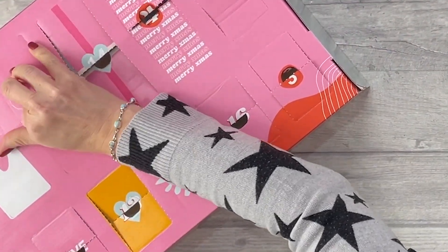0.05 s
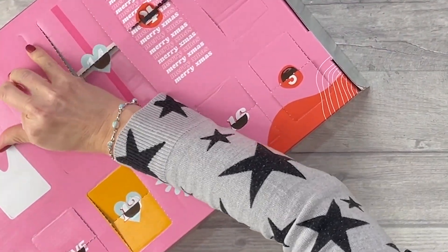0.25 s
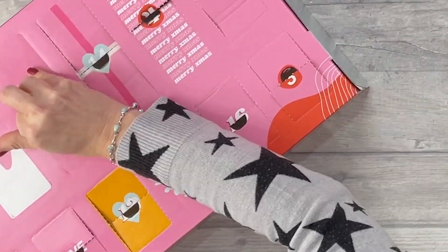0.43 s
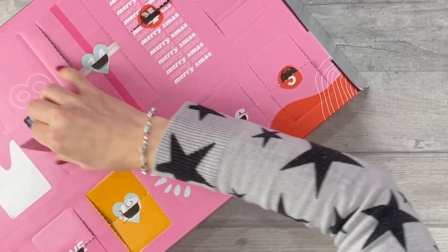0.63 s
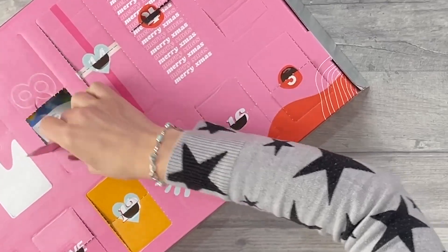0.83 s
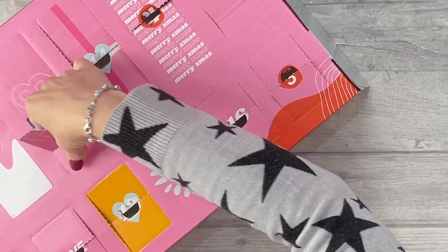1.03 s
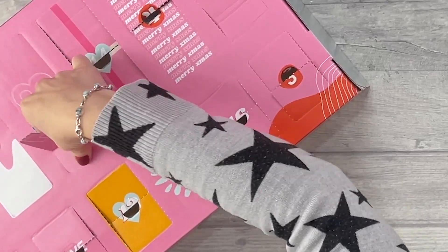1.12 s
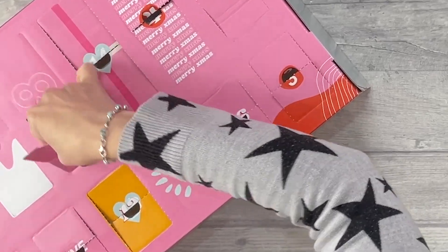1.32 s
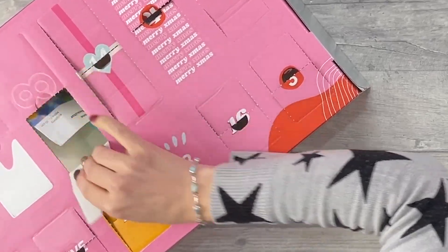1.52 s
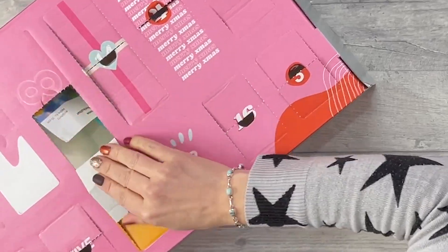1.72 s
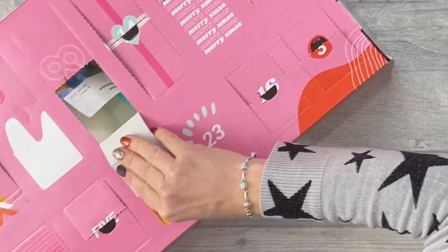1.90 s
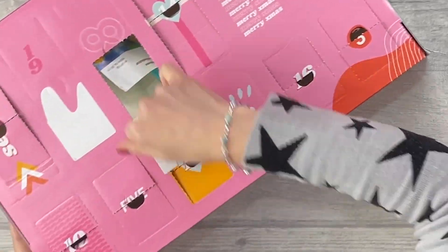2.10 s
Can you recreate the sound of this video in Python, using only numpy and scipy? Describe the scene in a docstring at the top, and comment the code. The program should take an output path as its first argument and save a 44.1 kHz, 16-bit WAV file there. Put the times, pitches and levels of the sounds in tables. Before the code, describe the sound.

Close up in a small quiet room, stiff cardboard cracks open sharply over a hollow box, fingers tap lightly, remaining paper ties tear in a fast run, and a hand knocks and rubs the flap.

```python
"""Bursting a perforated cardboard door

One loud pop with a thump of the lid, then small taps and crackles; a second later paper ties rip in a
quick run, then knocks, clicks and a hand sliding over the flap. Close stereo microphone, small room.
Tears and clicks are dying noise bursts, board and lid are damped modes, rubbing is rough coloured noise.
The microphone rounds off the highest peaks.
"""
import sys
import numpy as np
from scipy import signal
from scipy.fft import rfft, irfft, next_fast_len
from scipy.io import wavfile
from scipy.ndimage import map_coordinates

SR = 44100
rng = np.random.default_rng(int(sys.argv[2]) if len(sys.argv) > 2 else 0)


def pcm_store(signal):
    """Save signal as 16-bit PCM."""
    levels = np.round(np.clip(np.atleast_2d(signal), -1, 1) * 32767)
    wavfile.write(sys.argv[1], SR, levels.astype(np.int16).T)


N = 94815


def amp(db):
    """Decibels to gain."""
    return 10 ** (np.asarray(db) / 20)


def unit(x):
    """Scaled to rms 1."""
    return x / np.sqrt(np.mean(x ** 2) + 1e-20)


def along(points, hz):
    """(f/Hz, value) points interpolated on a log frequency axis."""
    f, v = np.transpose(points)
    return np.interp(np.log(hz + 1), np.log(f + 1), v)


def seconds(count=SR // 2):
    """Time axis."""
    return np.arange(count) / SR


def add(track, start_s, x):
    """Mix x into the track from start_s."""
    i = max(round(start_s * SR), 0)
    track[i:i + len(x)] += x[:max(N - i, 0)]


def coloured(x, points, tilt_db_per_oct=0, size=8192):
    """Minimum-phase filter of unit energy; the tilt acts above 300 Hz."""
    hz = np.fft.rfftfreq(size, 1 / SR)
    response_db = along(points, hz) + tilt_db_per_oct * np.log2(np.maximum(hz, 300))
    cepstrum = irfft(np.log(amp(response_db)))
    # fold the cepstrum: causal
    cepstrum[1:size // 2] *= 2
    cepstrum[size // 2 + 1:] = 0
    kernel = irfft(np.exp(rfft(cepstrum)))
    kernel = kernel / np.linalg.norm(kernel)
    return signal.fftconvolve(x, kernel)[:len(x)]


def filtered(x, order, cut_hz, kind="low"):
    """Butterworth filter."""
    b, a = signal.butter(order, cut_hz, kind, fs=SR)
    return signal.lfilter(b, a, x)


def fade(t60_s):
    """Exponential decay, -60 dB at t60_s."""
    return np.exp(-np.log(1000) * seconds() / t60_s)


def ring(hz, t60_s):
    """One damped mode."""
    return np.sin(2 * np.pi * hz * seconds()) * fade(t60_s)


def burst(t60_s, colour, tilt_db_per_oct=0):
    """Dying coloured noise of unit energy: a dense spray of fibre breaks."""
    noise = rng.standard_normal(SR // 2) * fade(t60_s)
    x = coloured(noise, colour, tilt_db_per_oct)
    return x / np.linalg.norm(x)


def stroke(start_s, length_s):
    """Swell that rises quickly and eases off."""
    u = np.clip((seconds(N) - start_s) / length_s, 0, 1)
    return np.sin(np.pi * u ** .65)


ROUGH_DB, ROUGH_PER_S = 1.6, 540


def friction(rough_db=ROUGH_DB):
    """Unit-rms noise whose strength jumps as the surfaces catch and slip."""
    knots = rng.standard_normal(N)
    wander_db = rough_db * map_coordinates(knots, [seconds(N) * ROUGH_PER_S])
    return unit(rng.standard_normal(N) * amp(wander_db))


# decay of the room: f/Hz, t60/s
ROOM_T60_S = [(100, 0.16), (400, 0.21), (2000, 0.18), (6000, 0.21), (10000, 0.17), (14000, 0.21)]
# spectrum of its tail: f/Hz, level/dB
ROOM_LEVEL_DB = [(60, -17), (160, -14.5), (350, -11), (1500, -6), (5000, -7), (9000, -5), (15000, -14)]
ROOM_GAP_S, ROOM_BUILD_S = 0.009, 0.001


def in_room(x, wet_db=0):
    """Direct sound plus a fresh diffuse tail: noise decaying at each frequency's own rate."""
    hz, t, noise = signal.stft(rng.standard_normal(SR // 2), SR, nperseg=256)
    t60_s = along(ROOM_T60_S, hz)[:, None]
    gain = amp(along(ROOM_LEVEL_DB, hz))[:, None] * np.sqrt(2 * np.log(1000) / (t60_s * SR))
    decay = np.exp(-np.log(1000) * t / t60_s)
    tail = signal.istft(noise * gain * decay, SR, nperseg=256)[1][:SR // 2]
    tail = tail * np.clip((seconds() - ROOM_GAP_S) / ROOM_BUILD_S, 0, 1)
    return x + amp(wet_db) * signal.fftconvolve(x, tail)[:len(x)]


# room noise spectrum: f/Hz, level/dB
FLOOR_COLOUR = [(15, -3.5), (28, 6.5), (50, -1.5), (120, -19.5), (300, -13.5), (800, -22.5), (2000, -32),
                (4000, -33.5), (8000, -36), (16000, -45.5)]
FLOOR_DB = -60.5


def room_floor():
    """The quiet of the room: steady, mostly low noise."""
    return amp(FLOOR_DB) * coloured(rng.standard_normal(N), FLOOR_COLOUR)


# lid flexes under the hand: t/s, length/s, level/dB
FLEXES = [(0.559, 0.18, -65), (1.103, 0.13, -64.5), (1.253, .11, -46), (1.803, 0.069, -49.5)]
# flexing spectrum: f/Hz, level/dB
FLEX_COLOUR = [(15, -6), (30, 2), (80, -3.5), (130, -10), (300, -31), (1000, -71)]


def lid_flexing():
    """Slow bending of the lid: swells of low noise."""
    swells = sum(amp(db) * stroke(s, length_s) for s, length_s, db in FLEXES)
    return swells * coloured(rng.standard_normal(N), FLEX_COLOUR)


# hand over the open flap: t/s, level/dB
SLIDE = [(1.57, -72), (1.619, -51.5), (1.662, -42), (1.705, -38.5), (1.755, -38.5), (1.79, -44),
         (1.85, -39), (1.901, -39.5), (1.949, -38.5), (2.01, -40), (2.052, -45.5), (2.081, -72.5),
         (2.109, -104)]
# skin on board spectrum: f/Hz, level/dB
SLIDE_COLOUR = [(60, -25), (250, -11.5), (700, 0), (1200, -0.5), (2200, 2), (3400, 1), (4600, -1.5),
                (6000, -3.5), (7500, -9.5), (9500, -7.5), (12500, -15.5), (16000, -27)]
SLOW_HZ, SLOW_DB = 2500, -40
BRIGHTEN = 1.8  # treble dB per dB of level


def slide():
    """Friction noise of the sliding hand; treble grows faster than the rest as it gets louder."""
    level_db = np.interp(seconds(N), *np.transpose(SLIDE), left=-120)
    treble_db = SLOW_DB + BRIGHTEN * (level_db - SLOW_DB)
    hiss = coloured(friction(), SLIDE_COLOUR)
    low = filtered(hiss, 1, SLOW_HZ)
    return amp(level_db) * low + amp(treble_db) * (hiss - low)


# skin and torn edges: t/s, length/s, level/dB, tilt/(dB/octave)
SCUFFS = [(-0.012, 0.038, -41.5, -3.5), (0.096, 0.041, -66, -8.5), (0.405, 0.055, -39, -5.5),
          (0.449, 0.054, -50.5, -7.5), (0.736, 0.062, -62, 3.5), (0.888, 0.041, -73, 2),
          (1.098, 0.065, -70, 0.5), (1.189, 0.032, -52, -4), (1.44, 0.17, -47, -4),
          (1.605, 0.082, -45.5, -4)]
SCUFF_ROUGH_DB = 3.5


def scuffs():
    """Short rubs, each with its own friction noise and tilt."""
    out = np.zeros(N)
    for s, length_s, db, tilt_db_per_oct in SCUFFS:
        noise = coloured(friction(SCUFF_ROUGH_DB), SLIDE_COLOUR, tilt_db_per_oct)
        out += amp(db) * stroke(s, length_s) * noise
    return out


# fingertip on the glossy print: t/s, length/s, level/dB
BRUSHES = [(0.84, .03, -53), (0.865, .07, -62.5)]
# brush spectrum: f/Hz, level/dB
BRUSH_COLOUR = [(500, -12), (2500, -13), (4500, -4), (7000, 0), (9500, 0), (11500, -10), (16000, -24)]


def brushes():
    """A fingertip on gloss: brief swells of high friction noise."""
    swells = sum(amp(db) * stroke(s, length_s) for s, length_s, db in BRUSHES)
    return swells * coloured(friction(), BRUSH_COLOUR)


# loose flap under the fingers: t/s, length/s, level/dB
JUDDERS = [(0.48, 0.038, -53), (0.58, 0.054, -44.5), (0.735, 0.09, -51.5), (0.87, 0.096, -57),
           (1.5, 0.098, -43.5), (1.7, 0.16, -46)]
# judder spectrum: f/Hz, level/dB
JUDDER_COLOUR = [(80, -18), (200, -11.5), (320, 3.5), (520, -0.5), (800, -6.5), (1400, -15), (3000, -35),
                 (8000, -64)]


def judders():
    """The loose flap judders: swells of low-mid friction noise."""
    swells = sum(amp(db) * stroke(s, length_s) for s, length_s, db in JUDDERS)
    return swells * coloured(friction(), JUDDER_COLOUR)


# modes of the hollow box: f/Hz, level/dB, t60/s
BOX = [(148, -45.5, 0.077), (248, -24.5, 0.13), (340.7, -18.5, .19), (399, -27, 0.22), (458.8, -19, 0.12),
       (552, -30.5, 0.16), (677, -36.5, 0.19), (791, -17, 0.11), (869, -29.5, 0.18)]


def box():
    """Box modes of alternating sign, levels a little different at each blow."""
    out = np.zeros(SR // 2)
    for k, (hz, db, t60_s) in enumerate(BOX):
        out += (-1) ** k * amp(db + rng.normal(0, 1)) * ring(hz, t60_s)
    return out


# slap spectrum: f/Hz, level/dB
SLAP_COLOUR = [(60, -28), (200, 12), (350, 7), (750, 3), (1300, 1), (2500, -0.5), (4000, -12), (8000, -12),
               (16000, -22)]
KNOCK_T60_S, SLAP_T60_S = .04, 0.024
SLAP_DB, KNOCK_WET_DB = 16, -5
PANEL_CUT_HZ = 190  # a small panel radiates little below this


def knock(hz, bright_hz):
    """The touched panel swings, slaps and wakes the box; a soft contact is duller."""
    slap = amp(SLAP_DB) * in_room(burst(SLAP_T60_S, SLAP_COLOUR))
    slap = filtered(slap, 2, bright_hz)
    swing = in_room(ring(hz, KNOCK_T60_S), KNOCK_WET_DB) + box()
    swing = filtered(swing, 1, 2 * bright_hz)
    return filtered(swing + slap, 2, PANEL_CUT_HZ, "high")


# fingers and flap on the board: t/s, level/dB, pitch f/Hz, contact brightness f/Hz
KNOCKS = [(0.383, -23.5, 314, 450), (0.396, -29.5, 344, 390), (0.437, -33, 405, 1480),
          (0.489, -35, 344, 439), (0.579, -32.5, 376.3, 900), (0.596, -34.5, 320, 1100),
          (0.6625, -19.5, 400, 2400), (0.677, -30, 585, 1530), (0.714, -36, 403.5, 593),
          (0.745, -42, 302, 501), (0.772, -43, 326, 497), (0.85, -43, 330, 405), (1.006, -45, 311.6, 400),
          (1.4532, -22, 594, 3510), (1.457, -36.5, 355, 2960), (1.513, -28, 361, 700),
          (1.524, -34, 335, 450), (1.534, -35, 456, 2520), (1.549, -55, 393.6, 594),
          (1.563, -25, 652, 1600), (1.582, -32, 405, 700), (1.59, -29.5, 176, 400),
          (1.721, -30.5, 770, 610), (1.759, -30, 430, 500), (1.787, -24, 231, 400), (1.791, -28, 510, 500),
          (1.818, -21, 433, 644), (1.822, -35.5, 385, 600), (1.831, -32, 337, 500), (1.934, -35, 710, 700),
          (1.974, -29, 238, 354), (1.983, -30.5, 239, 303), (2.078, -45, 228, 290)]


def knocks():
    """Dull knocks as the fingers work at the door."""
    out = np.zeros(N)
    for s, db, hz, bright_hz in KNOCKS:
        add(out, s, amp(db) * knock(hz, bright_hz))
    return out


# single fibres and fingernails: t/s, level/dB, tilt/(dB/octave)
TICKS = [(0.035, -29, -0.5), (0.118, -41, 1), (0.1875, -26, 1), (0.2168, 6, -1.5), (0.2532, -8.5, 5),
         (0.382, -22, -4), (0.408, -13.5, 15), (0.4102, -27.5, 11.5), (0.4262, -17, -6.5),
         (0.4545, -24.5, -1), (0.557, -43.5, 9), (0.596, -31, -3), (0.617, -35, 0.5), (0.6705, -11, -1.5),
         (0.7117, -16, 1.5), (1.4547, -12, -4), (1.457, -19, -2.5), (1.4705, -20, -2.5),
         (1.482, -22.5, -1.5), (1.5105, -24, -7), (1.5328, -11, -8), (1.5352, -12.5, -3), (1.563, -12, -6),
         (1.818, -8, -2), (1.9311, -8.5, 2)]
# click spectrum: f/Hz, level/dB
TICK_COLOUR = [(200, -12), (1000, 7.5), (2500, 3.5), (5000, 2), (10000, -2.5), (16000, -18.5)]
TICK_T60_S = 0.013


def ticks():
    """Dry clicks: very short noise bursts."""
    out = np.zeros(N)
    for s, db, tilt_db_per_oct in TICKS:
        click = burst(TICK_T60_S, TICK_COLOUR, tilt_db_per_oct)
        add(out, s, amp(db) * in_room(click, wet_db=4.5))
    return out


# loose fibres along the torn edge: t/s, length/s, level/dB
CRACKLES = [(0.0, .035, -38), (0.41, .05, -24), (1.458, .04, -25), (1.534, .06, -29)]
CRACKLE_PER_S, CRACKLE_SPREAD_DB, CRACKLE_TILT_DB_PER_OCT = 130, 0.5, -5


def crackling():
    """Fibres part one by one: coloured impulses, one at a random moment in each time slot."""
    out = np.zeros(N)
    for s, length_s, db in CRACKLES:
        slots = np.arange(24)
        times_s = (slots + rng.random(len(slots))) / CRACKLE_PER_S
        spread = np.clip(rng.standard_normal(len(slots)), -2, 1)
        sizes = amp(db + CRACKLE_SPREAD_DB * spread)
        for t, size in zip(times_s[times_s < length_s], sizes):
            add(out, s + t, np.array([size]))
    return in_room(coloured(out, TICK_COLOUR, CRACKLE_TILT_DB_PER_OCT))


# lid modes, main mode last: f/Hz, level/dB, t60/s
LID = [(30, -30, .22), (65, -19, .19), (88, -28, .15), (148, -10, .09)]


def lid_thump():
    """The lid springs back: low damped modes."""
    return sum(amp(db) * ring(hz, t60_s) for hz, db, t60_s in LID)


# second seam: t/s, snap level/dB, flap jerk level/dB, jerk pitch f/Hz
TIES = [(1.2056, -18.5, -31, 479), (1.2128, -7, -13.5, 757), (1.2189, -7.5, -12, 400),
        (1.2256, -4, -18, 776), (1.2276, -2, -11, 290), (1.2347, 8.5, -15, 473.6), (1.238, -0.5, -20, 706),
        (1.243, -7.5, -13, 421)]
# torn paper spectrum: f/Hz, level/dB
TIE_COLOUR = [(100, -13), (400, 0.5), (800, 2), (1500, -2), (3000, 1), (5000, -2), (6400, 0), (8000, -6),
              (12000, -7), (16000, -18)]
TIE_T60_S, JERK_BRIGHT_HZ = .006, 2000
TEAR_START_S, TEAR_LENGTH_S, TEAR_DB = 1.209, 0.057, -24  # fibres between the ties
RIP_LID_DB = -22.5


def rip():
    """Fibres tear in a quick run; each tie snaps and the flap jerks; the lid's main mode is shaken once."""
    noise = coloured(friction(rough_db=4), TIE_COLOUR, tilt_db_per_oct=-2.5)
    out = in_room(amp(TEAR_DB) * stroke(TEAR_START_S, TEAR_LENGTH_S) * noise)
    for s, snap_db, jerk_db, hz in TIES:
        snap = in_room(burst(TIE_T60_S, TIE_COLOUR), wet_db=3.0)
        add(out, s, amp(snap_db) * snap + amp(jerk_db) * knock(hz, JERK_BRIGHT_HZ))
    main_hz, _, main_t60_s = LID[-1]
    add(out, TIES[4][0], amp(RIP_LID_DB) * ring(main_hz, main_t60_s))
    return out


# bands of the stiff door: f/Hz, width/Hz, level/dB, t60/s
DOOR = [(2880, 620, -21, .19), (5450, 1000, -19, .21), (4500, 7000, -24, .19), (850, 700, -23, .12)]


def door_ring():
    """The stiff door rings in broad bands: decaying band noise."""
    hz = np.fft.rfftfreq(SR // 2, 1 / SR)
    out = np.zeros(SR // 2)
    for centre_hz, width_hz, db, t60_s in DOOR:
        shape = 1 / (1 + (2 * (hz - centre_hz) / width_hz) ** 4)
        band = irfft(rfft(rng.standard_normal(SR // 2)) * shape)
        out += amp(db) * unit(band) * fade(t60_s)
    return out


# first seam, tie after tie: t/s, level/dB, t60/s
POP = [(0.2056, 15.5, 0.022), (0.2083, 15.5, 0.023), (0.2105, 17.5, 0.0059)]
# crack spectrum: f/Hz, level/dB
POP_COLOUR = [(60, -10), (350, 2.5), (900, 0), (1600, -5.5), (2300, -2.5), (2850, 2), (4200, -9),
              (5600, 3.5), (7200, -4), (9000, -0.5), (12000, -3), (16000, -10.5)]
POP_WET_DB, POP_BOX_DB = -2, -4.5
LID_BACK_S = 0.2195
PUSH_START_S, PUSH_LENGTH_S, PUSH_DB = 0.2165, 0.0017, -1  # lid first driven inwards


def pop():
    """The seam gives way: a crack, the ring of door and box, a push on the lid and its thump."""
    out = np.zeros(N)
    for s, db, t60_s in POP:
        add(out, s, amp(db) * in_room(burst(t60_s, POP_COLOUR), POP_WET_DB))
    break_s = POP[1][0]
    add(out, break_s, door_ring())
    add(out, break_s, amp(POP_BOX_DB) * box())
    add(out, LID_BACK_S, lid_thump())
    return out - amp(PUSH_DB) * stroke(PUSH_START_S, PUSH_LENGTH_S)


BALANCE_DB, LEFT_LEAD_S = -1.44, 2.2e-5  # left minus right


def scene():
    """Stereo mix: reaches the left port a moment earlier and the right one a little louder."""
    background = room_floor() + lid_flexing()
    rubbing = in_room(slide() + scuffs() + brushes() + judders())
    mono = background + rubbing + knocks() + ticks() + crackling() + rip() + pop()
    size = next_fast_len(N + SR // 4)
    side = np.array([[.5], [-.5]])
    hz = np.fft.rfftfreq(size, 1 / SR)
    lead = np.exp(2j * np.pi * hz * LEFT_LEAD_S * side)
    return amp(BALANCE_DB * side) * irfft(rfft(mono, size) * lead, size)[:, :N]


CEILING, TOP_HZ = 1.0, 16000


def record(dry):
    """The microphone rounds off the highest peaks and keeps nothing above its band limit."""
    held = dry / (1 + np.abs(dry / CEILING) ** 6) ** (1 / 6)
    size = next_fast_len(N + SR // 4)
    passed = np.fft.rfftfreq(size, 1 / SR) < TOP_HZ
    return irfft(rfft(held, size) * passed, size)[:, :N]


dry = scene()
out = record(dry)
pcm_store(out)
```